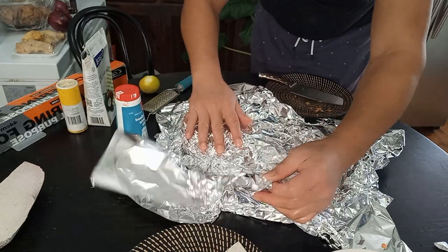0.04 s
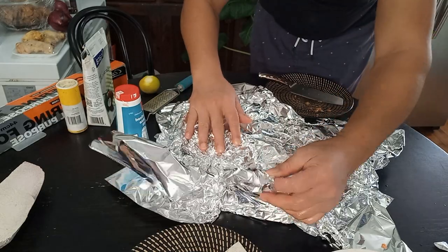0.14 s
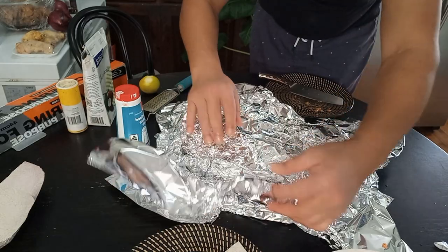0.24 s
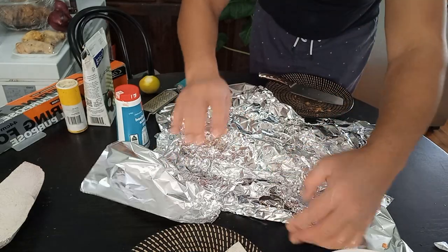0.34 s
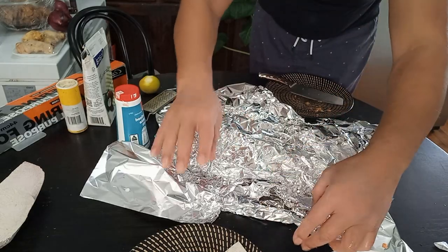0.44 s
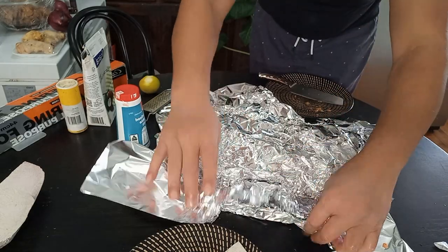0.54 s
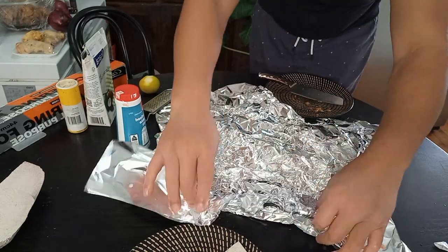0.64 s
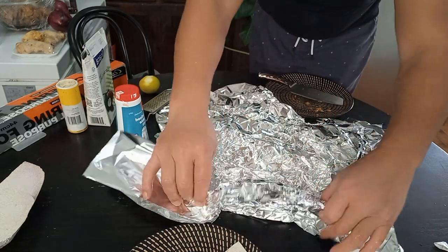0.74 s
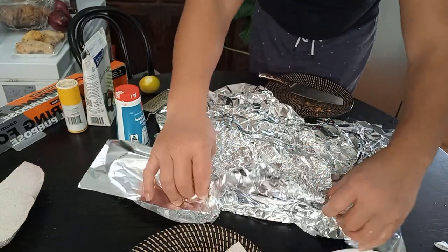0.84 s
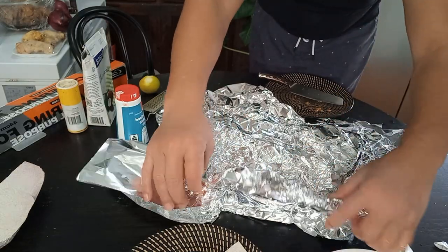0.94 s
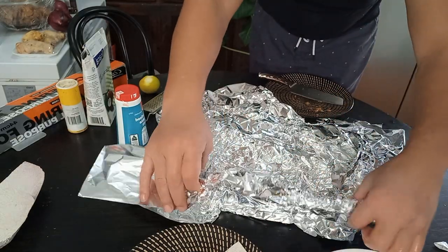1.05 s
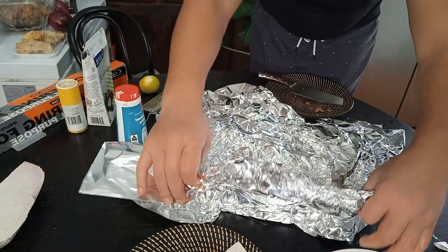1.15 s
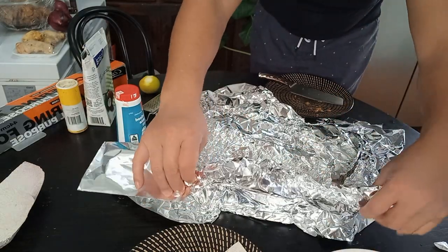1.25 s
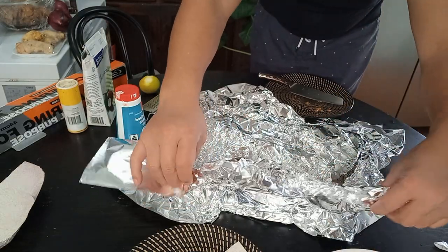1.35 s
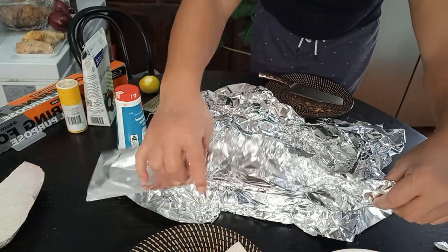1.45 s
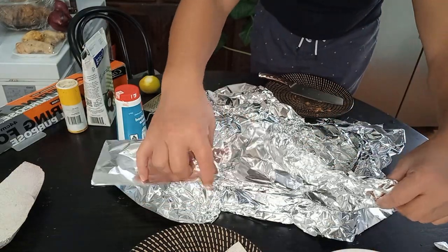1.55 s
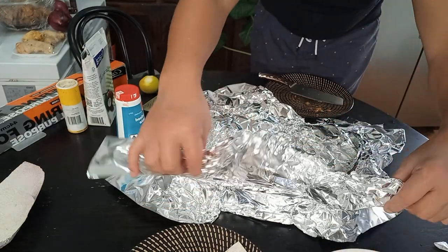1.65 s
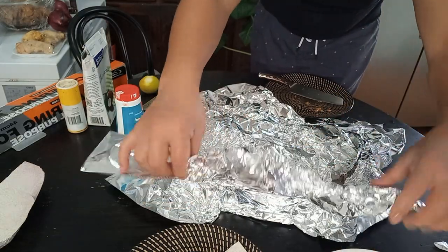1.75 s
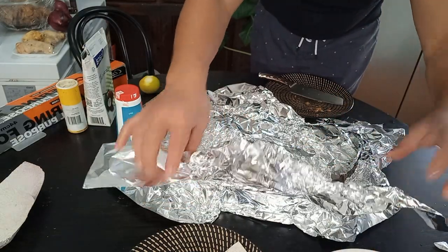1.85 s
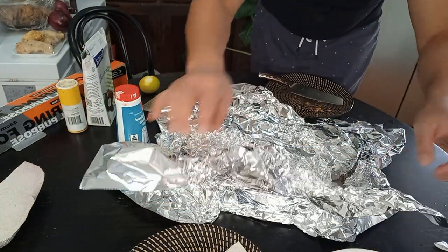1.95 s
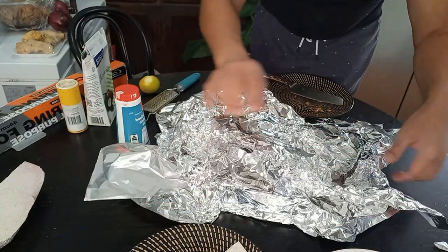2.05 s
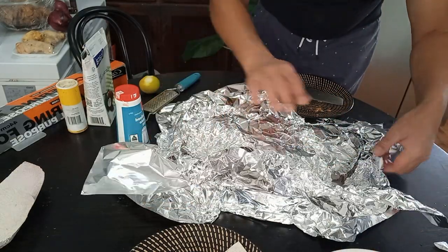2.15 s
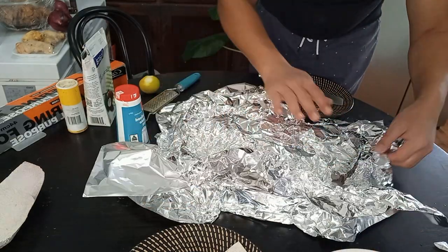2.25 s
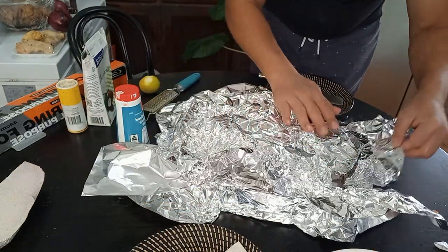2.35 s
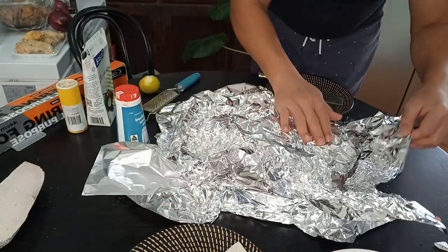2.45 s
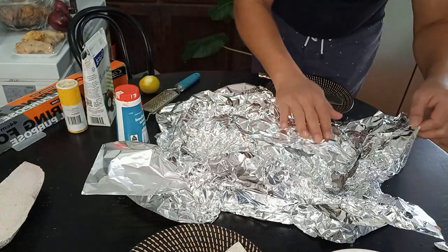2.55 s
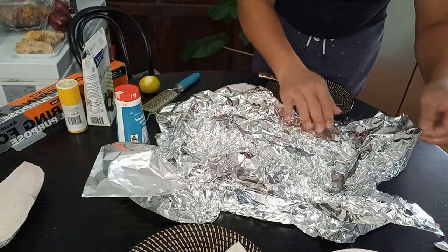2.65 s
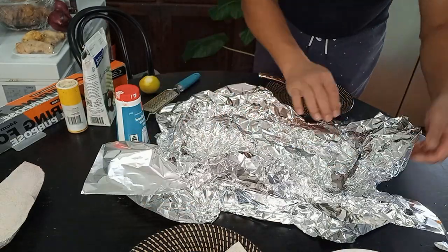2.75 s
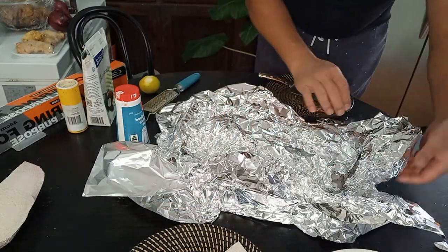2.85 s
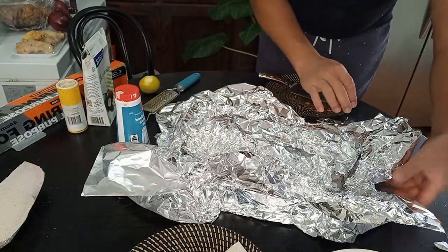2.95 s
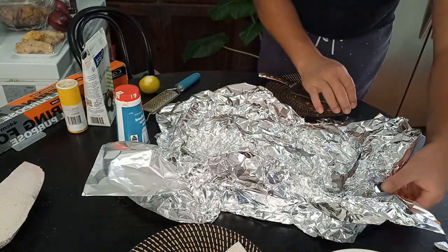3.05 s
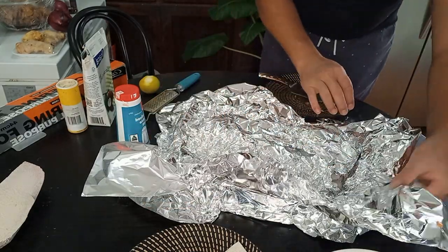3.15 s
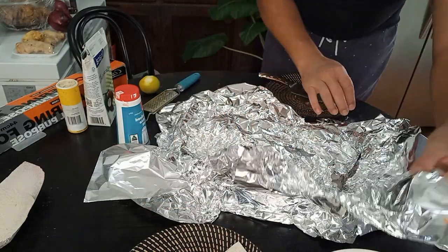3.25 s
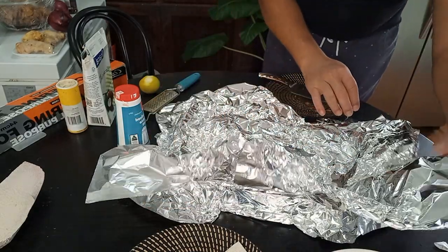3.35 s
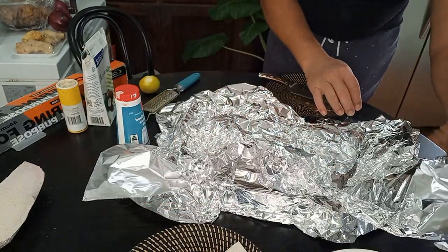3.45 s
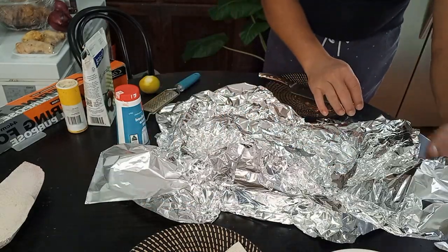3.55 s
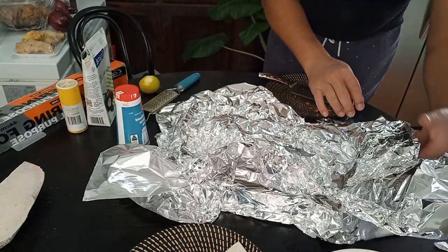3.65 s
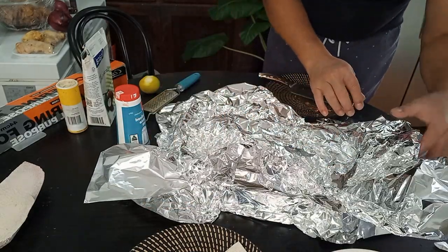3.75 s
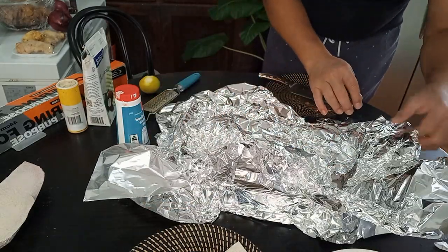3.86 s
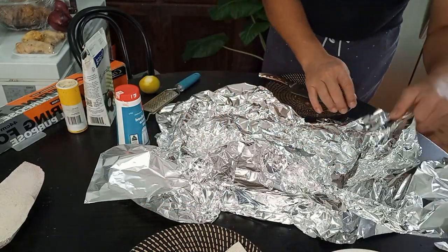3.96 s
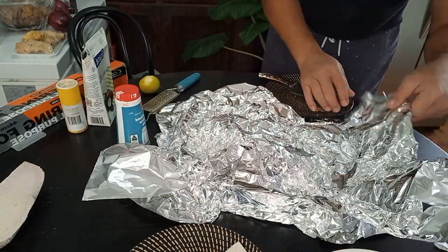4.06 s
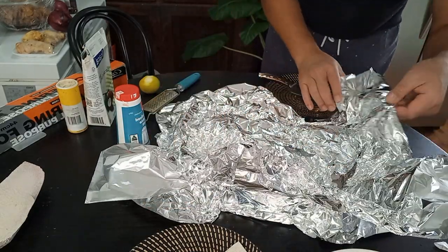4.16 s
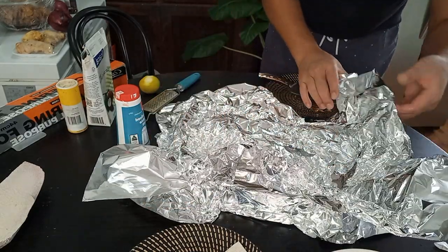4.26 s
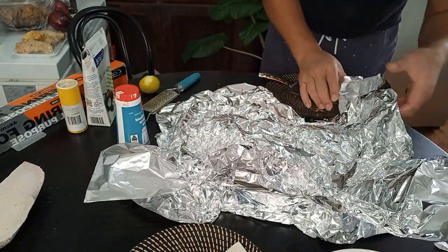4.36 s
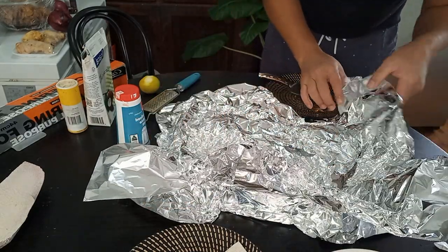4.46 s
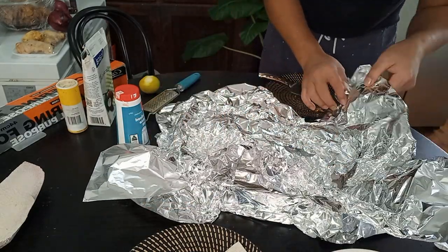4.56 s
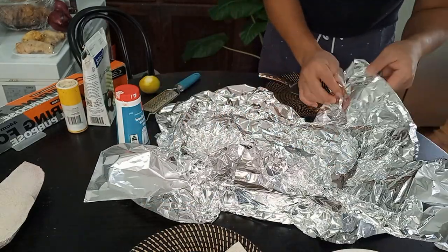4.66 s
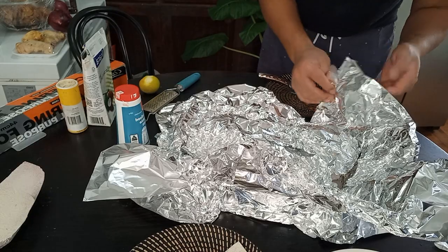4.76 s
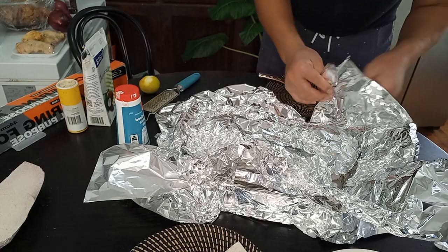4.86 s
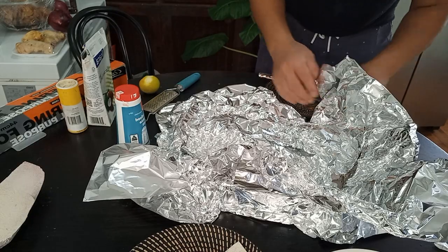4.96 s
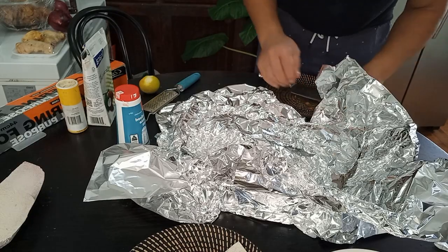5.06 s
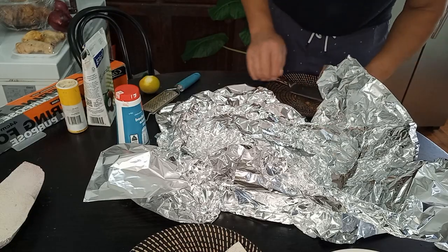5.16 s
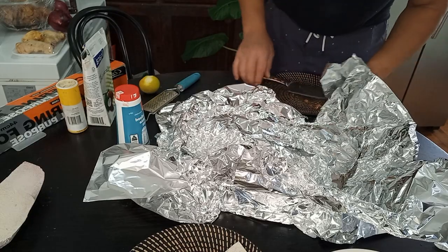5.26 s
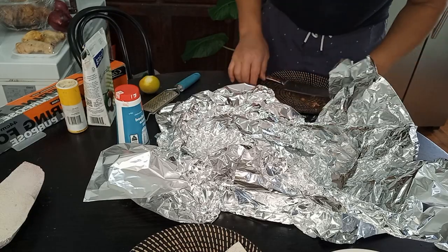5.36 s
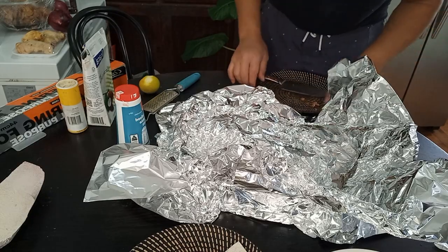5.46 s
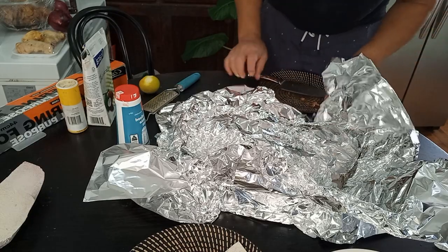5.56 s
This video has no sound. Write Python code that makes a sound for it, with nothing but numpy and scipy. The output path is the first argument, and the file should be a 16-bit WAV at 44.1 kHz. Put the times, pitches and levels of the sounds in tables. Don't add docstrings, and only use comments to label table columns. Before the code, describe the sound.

Aluminium foil is handled close to two spaced microphones in a small, fairly dry kitchen. It starts abruptly with a loud crunch and hollow sheet pop at 0 s, crackles briefly, and eases around 0.5 s. From 0.65 to 1.85 s pressing and dragging make dense, bright, fizzy crackling, with sharp buckles near 0.7, 0.85, 1.07 and 1.6 s. It falls almost quiet around 2.0-2.15 s. Folding rustles return at 2.2-2.6 s with a dull pop, then thin out. A strong burst grows from 3.0 to 3.4 s with a low puff of air. Shorter crackles follow at 3.65 and 3.9-4.3 s, then a fuller fold with a hollow flex at 4.5-4.9 s. Lighter, sparse rustles and small low pops continue from 5.0 s, and a new rustle starts at the end. Faint low room rumble and hum remain underneath.

```python
import sys
import numpy as np
from scipy import signal
from scipy.fft import rfft, irfft, next_fast_len
from scipy.io import wavfile
from scipy.ndimage import uniform_filter1d

SR = 44100
rng = np.random.default_rng(int(sys.argv[2]) if len(sys.argv) > 2 else 0)


def to_linear_factor(level_db):
    exponent = np.asarray(level_db, float) / 20
    return 10 ** exponent


def wrap_up_sound(samples):
    columns = np.atleast_2d(samples).T
    tamed = np.clip(columns, -1, 1)
    steps = np.round(tamed * 32767).astype(np.int16)
    wavfile.write(sys.argv[1], SR, steps)


N = 247092
HZ = np.fft.rfftfreq(next_fast_len(N), 1 / SR)
STEPS = np.arange(0, N / SR + .002, .001)

# (low edge [Hz], high edge [Hz])
CREASE_BANDS = [
    (3500, 9000),
    (9000, 17000),
    (1200, 3500),
    (450, 1200),
]
# (time [s], peak [dB], body relative to peak [dB])
BUCKLES = [(0.112, -30, -11), (.229, -35, -6), (.35, -40, -23), (.404, -34.5, -20), (.468, -40.5, -32),
           (.54, -49.5, -36), (.598, -41, -25), (.686, -29, -10), (0.856, -28.5, -3), (.996, -33, -17),
           (1.066, -26.5, -9.5), (1.41, -31, -10), (1.616, -24, -14), (1.788, -34, -24),
           (1.883, -34.5, -12.5), (2.164, -46.5, -13.5), (2.22, -38, -24), (2.406, -40, 3),
           (2.786, -46, -25), (2.91, -44, -18), (2.963, -38.5, -6.5), (3.038, -33, -11),
           (3.135, -28.5, -32), (3.325, -26, -8), (3.526, -48, -29), (3.631, -42, -17), (3.912, -53, -10),
           (4.118, -32, -7), (4.486, -39.5, -32), (4.832, -33, -3)]
# (time [s], peak [dB], pitch [Hz], time to fade by 60 dB [s])
PINGS = [(.001, -35, 450, .12), (.001, -37, 540, .15), (.001, -36, 335, .12), (.001, -44, 1080, .1),
         (.009, -38, 680, .1), (.715, -46, 600, .08), (.72, -45, 800, .1), (.87, -46, 520, .08),
         (.885, -46, 1380, .08), (1.95, -69, 1130, .8), (2.407, -40, 690, .1), (2.484, -46, 1150, .06),
         (2.585, -41, 2400, .06), (2.96, -54, 1600, .08), (3.08, -53, 580, .1), (3.72, -50, 980, .1),
         (3.73, -49, 700, .1), (3.73, -53, 1350, .08), (3.9, -60, 1530, .08), (3.905, -60, 2050, .08),
         (3.91, -60, 2600, .08), (4.64, -43, 450, .15), (4.69, -43, 350, .15), (5.262, -48, 270, .15),
         (5.303, -41, 260, .1), (5.33, -47, 280, .08), (5.43, -58, 1250, .5), (5.434, -41, 245, .1),
         (5.46, -46, 320, .08), (5.525, -57, 1200, .7)]
# (frequency [Hz], level [dB per Hz])
FOIL_COLOUR = [(240, -50), (400, -4), (466, -6.5), (615, -5), (717, -4), (786, -5.5), (931, -5.5),
               (1370, -5.5), (3080, -5.5), (7290, -3), (8630, -6), (12700, 3.5), (15700, 1)]
# (frequency [Hz], level [dB per Hz])
ROOM_COLOUR = [(25, -41), (38, -33), (50, -4), (59, -2), (72, -7), (100, -11.5), (200, -16.5), (400, -13),
               (1000, -23), (3000, -43), (7500, -21), (16000, -50)]
# (frequency [Hz], time to fade by 60 dB [s])
KITCHEN_FADE = [(200, 0.32), (600, 0.14), (1500, 0.19), (4000, 0.22), (8000, 0.12), (15000, 0.062)]
# (frequency [Hz], likeness [0 to 1])
LIKENESS = [(30, 0.74), (80, 0.68), (300, 0.43), (640, 0.051), (1400, 0.043), (3000, 0.086)]
# (start [s], rise [s], hold [s], effort [dB], breadth
# of folds [dB])
HAND_MOVES = [(0, 0.00067, 0.004, -32, -3.5), (0, 0.0016, .17, -43.5, -14), (0.218, 0.056, 0.008, -46, -15.5),
              (0.32, 0.036, 0.025, -57, -21), (0.522, 0.035, .04, -76.5, -7.5),
              (0.582, 0.036, .01, -50.5, -19.5), (0.636, 0.099, 0.0089, -37.5, -4.5),
              (0.695, 0.079, 0.061, -38, -13), (0.814, 0.061, 0.073, -37.5, -10),
              (0.933, 0.056, 0.378, -43, -18), (1.367, 0.053, 0.19, -38, -15.5),
              (1.497, .15, 0.067, -39.5, -13.5), (1.727, 0.062, 0.026, -40.5, -17),
              (1.858, 0.021, 0.041, -54, -19), (1.933, 0.029, 0.036, -62, -20), (2.032, 0.044, 0.069, -78, -9),
              (2.152, .1, 0.034, -49, -10.5), (2.189, .2, 0.048, -40.5, -6.5), (2.385, .12, 0.08, -39.5, -9.5),
         (2.595, .06, 0.034, -53, -16), (2.697, 0.035, 0.014, -69, -13), (2.8, .03, 0.033, -76, -6),
         (2.896, 0.032, 0.074, -53, -12), (2.993, 0.27, 0.036, -39, -13.5),
         (3.241, .12, 0.017, -34.5, -8.5), (3.617, 0.033, 0.068, -46.5, -11.5),
         (3.742, 0.033, 0.015, -62, -11.5), (3.888, 0.067, .02, -48.5, -18.5),
         (3.958, 0.079, .02, -42.5, -19.5), (4.068, 0.064, 0.055, -39, -11.5),
         (4.177, 0.048, 0.024, -46, -12), (4.262, 0.038, 0.0088, -46.5, -26),
         (4.474, 0.099, 0.085, -38.5, -11.5), (4.59, .13, 0.028, -36.5, -10.5),
         (4.768, 0.061, 0.058, -43, -14), (4.888, 0.032, 0.051, -48.5, -18),
         (5.009, 0.079, 0.2, -58.5, -20.5), (5.173, 0.056, 0.067, -47, -13),
         (5.297, 0.046, 0.097, -52.5, -9.5), (5.458, 0.027, 0.052, -63.5, -4),
         (5.535, .07, .05, -41, -14.5)]
# (level [dB], gain [dB per dB of effort], share of breadth [dB per dB], release [dB/s], rise power [-])
CREASE_SIZES = [
    (-2, 0, 0.0033, 196, 1.18),
    (0, 0.07, 0, 231, 1.35),
    (-3.5, -0.05, 0.3, 210, 1.63),
    (-1.6, -0.22, 1.13, 232, 2.13),
    (-4.5, 0.36, 1.15, 262, 3.2),
]
# (time [s], level [dB], resonance [Hz], swell [s])
BOOMS = [(.02, -36.5, 493, 0.048), (.715, -49, 240, 0.021), (1.13, -60, 270, 0.05), (1.56, -59, 220, .02),
         (3.95, -60.5, 352, 0.035), (5.115, -63.5, 430, .015), (1.22, -53, 298, 0.028),
         (1.81, -57.5, 390, 0.024), (2.568, -43, 445, 0.027), (3.07, -57.5, 503, 0.053),
         (4.32, -61.5, 600, .04), (4.66, -40.5, 430, .055), (4.868, -49, 507, 0.041),
         (5.3, -48, 280, 0.059), (5.45, -50, 231, 0.032), (5.6, -57.5, 364, 0.1)]
# (time [s], level [dB], swell [s])
GUSTS = [
    (0, -58, 0.043),
    (.2, -68, 0.044),
    (1.02, -63.5, 0.11),
    (1.62, -57, 0.06),
    (2.53, -71.5, .1),
    (3.35, -54, .05),
    (4.13, -60, 0.043),
    (4.59, -62, 0.08),
    (5.05, -67, 0.055),
    (5.47, -56.5, .04),
]
# (time [s], left minus right [dB])
HANDS = [
    (0, 1),
    (1.6, 1.2),
    (2.2, -0.4),
    (4.0, -0.1),
    (4.3, 0.5),
    (5.6, .3),
]

USUAL_DB = -40


def evened(x):
    return x / np.sqrt(np.mean(x ** 2) + 1e-20)


def read(points, hz):
    f, value = np.transpose(points)
    return np.interp(np.log(hz + 1), np.log(f + 1), value)


def colour(x, gain):
    return irfft(rfft(x, next_fast_len(N)) * gain, next_fast_len(N))[..., :N]


def band(lo_hz, hi_hz):
    return 1 / (1 + (HZ / hi_hz) ** 8) - 1 / (1 + (HZ / lo_hz) ** 8)


def resonate(x, hz, width_hz):
    turn = np.exp(2j * np.pi * np.cumsum(hz) / SR)
    r = np.exp(-np.pi * width_hz / SR)
    return 2 * (turn * signal.lfilter([1 - r], [1, -r], x / turn)).real


def add(mix, s, sound):
    part = mix[round(s * SR):][:len(sound)]
    part += sound[:len(part)]


def per_sample(v):
    return np.interp(np.arange(N) / SR, STEPS, v)


def swell(s, db, width):
    return to_linear_factor(2 * db) * np.exp(-((STEPS - s) / max(width, .005)) ** 2)


def likened(a, b, hz):
    same = np.clip(read(LIKENESS, hz), 0, 1)
    return np.array([a, same * a + np.sqrt(1 - same ** 2) * b])


def alike_noise(gain):
    a, b = rfft(rng.standard_normal((2, N)), next_fast_len(N))
    return evened(irfft(likened(a, b, HZ) * gain, next_fast_len(N))[:, :N])


def room_tone():
    hz = 56.1 + 4.0 * evened(uniform_filter1d(rng.standard_normal(N), 9000))
    hum = to_linear_factor(-77) * evened(resonate(resonate(rng.standard_normal(N), hz, 5.8), hz, 11))
    air = to_linear_factor(-72) * alike_noise(to_linear_factor(read(ROOM_COLOUR, HZ)))
    return (air + hum) * to_linear_factor([[1], [-1]])


def echoes():
    taps = np.zeros((2, SR // 2))
    slots = np.arange(120, SR // 2 - 20, 16)
    at = slots + rng.integers(0, 16, (2, len(slots)))
    np.put_along_axis(taps, at, rng.choice([-1., 1.], at.shape), 1)
    hz, t, z = signal.stft(taps, SR, nperseg=256)
    z = likened(*z, hz[:, None]) * to_linear_factor(-60 * t / read(KITCHEN_FADE, hz)[:, None])
    strength = (abs(z) ** 2).sum(2).mean(0)
    z /= np.sqrt(uniform_filter1d(strength, size=9))[:, None]
    tail = signal.istft(z, SR, nperseg=256)[1]
    return tail / np.linalg.norm(tail[0])


def kitchen(x, count=6):
    turn_s = .008
    place = np.arange(N) / SR / turn_s - np.arange(count)[:, None]
    away = abs((place + count / 2) % count - count / 2)
    shares = np.cos(np.pi / 2 * np.minimum(away, 1))
    size = next_fast_len(N + SR // 2)
    wet = sum(rfft(share * x, size) * rfft(echoes(), size) for share in shares)
    return irfft(wet, size)[:, :N]


def effort():
    spring_per_db = .006
    start, rise, hold, db, breadth_db = np.transpose(HAND_MOVES)[..., None]
    rise = np.maximum(rise, .001)
    u = STEPS - start
    rising = np.clip(u / rise, 0, 1) ** 2
    extra_db = db - USUAL_DB
    after = np.maximum(u - rise - np.maximum(hold, 0), 0) * np.exp(spring_per_db * extra_db)
    work = []
    for rel_db, gain, share, fall, late in CREASE_SIZES:
        level_db = db + rel_db + gain * extra_db + share * breadth_db - fall * after
        work.append((rising ** late * to_linear_factor(2 * level_db)).sum(0))
    return np.array(work) + 1e-12


def waft(work):
    stir = to_linear_factor(2 * -69.5) * (work[0] / to_linear_factor(2 * USUAL_DB)) ** 0.26
    power = stir + sum(swell(s, db - 3.5, width) for s, db, width in GUSTS)
    puffs = alike_noise(band(38, 248) * to_linear_factor(read([(50, 2.0), (200, -5)], HZ)))
    return per_sample(np.sqrt(power)) * puffs * to_linear_factor([[1], [-1]])


def table(work):
    drone = evened(resonate(rng.standard_normal(N), np.full(N, 339), 36))
    return to_linear_factor(-19.5) * per_sample(np.sqrt(work[2])) * drone


def pings():
    out, t = np.zeros(N), np.arange(SR // 3) / SR
    for (s, db, hz, t60), (split, turn) in zip(PINGS, rng.random((len(PINGS), 2))):
        upper_hz = hz * (1.2 + 0.037 * split)
        upper = np.sin(2 * np.pi * (upper_hz * t + turn))
        pair = np.sin(2 * np.pi * hz * t) + .9 * np.exp(-t60 / .2) * upper
        add(out, s, to_linear_factor(db - 60 * t / t60) * pair * np.minimum(t / .005, 1))
    return out


def flex(work):
    booms = [(swell(s, db - 4.5, width), hz) for s, db, hz, width in BOOMS]
    booms.append((work[4], 492))
    power = sum(p for p, _ in booms)
    hz = per_sample(sum(p * f for p, f in booms) / power)
    lumps = evened(uniform_filter1d(rng.standard_normal(N), 500))
    pushes = rng.standard_normal(N) * to_linear_factor(3.67 * lumps)
    boom = evened(resonate(resonate(pushes, hz, 343), hz, 343))
    return per_sample(np.sqrt(power)) * boom


def snaps(count=36):
    snaps_per_s, size_spread_db, lag_s = 4000, 3, .00013
    chance, size, crease = rng.random(N), rng.exponential(1, N), rng.integers(0, count, N)
    clumps = evened(uniform_filter1d(rng.standard_normal(N), 400))
    strength = to_linear_factor(size_spread_db * np.minimum(size, 3.6) + 1.35 * clumps)
    train = (chance < snaps_per_s / SR) * strength
    t, out = np.arange(768) / SR, np.zeros((2, N))
    for k in range(count):
        tick = to_linear_factor(-60 * t / 0.0012)
        after_ring = 0.49 * to_linear_factor(-60 * t / (0.0079 * rng.uniform(0.15, 2.2)))
        ring = rng.standard_normal(768) * (tick + after_ring)
        heard = signal.oaconvolve(train * (crease == k), ring / np.linalg.norm(ring))[:N]
        lag = round(SR * (lag_s + .00014 * rng.standard_normal()))
        out += [np.roll(heard, lag), heard]
    return out


def crumple(work):
    power = np.array([per_sample(row) for row in work[:4]])
    u = np.arange(4000) / SR
    for start, db, body_db in BUCKLES:
        fade_s = max(0.011 + .00028 * (body_db + 19.5), .004)
        swarm = (1 - np.exp(-u / 0.0021)) * np.exp(-u / fade_s)
        for row, share_db in zip(power, (-10, -9, body_db - 8.5, body_db - 14)):
            add(row, start, to_linear_factor(2 * (db + share_db)) * swarm)
    crackle = rfft(snaps(), next_fast_len(N)) * to_linear_factor(np.clip(read(FOIL_COLOUR, HZ), -15, 15))
    out = np.zeros((2, N))
    for p, edges in zip(power, CREASE_BANDS):
        part = irfft(crackle * band(*edges), next_fast_len(N))[:, :N]
        out += np.sqrt(p) * evened(part)
    return out


def scene():
    work = effort()
    pan_db = np.interp(np.arange(N) / SR, *np.transpose(HANDS))
    body = colour(flex(work) + pings() + table(work), band(120, 8000))
    body_pair = np.array([np.roll(body, round(.00008 * SR)), body])
    sheet = crumple(work) + body_pair * to_linear_factor([[.6], [-.6]])
    heard = sheet + to_linear_factor(-1) * kitchen(sheet[0] - 0.5 * body)
    return heard * to_linear_factor([pan_db / 2, -pan_db / 2]) + waft(work) + room_tone()


def low_pass(x):
    return signal.sosfilt(signal.butter(12, 16660, fs=SR, output="sos"), x)


def record(dry):
    return low_pass(colour(dry, HZ < 16050))


dry = scene()
out = record(dry)
wrap_up_sound(out)
```